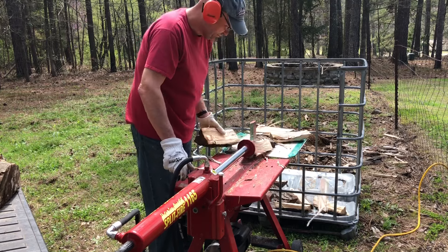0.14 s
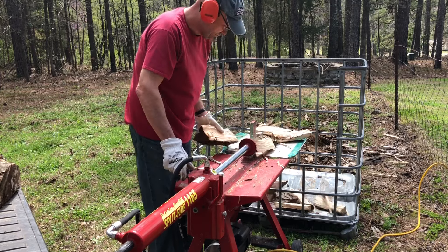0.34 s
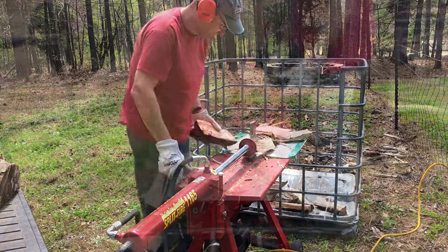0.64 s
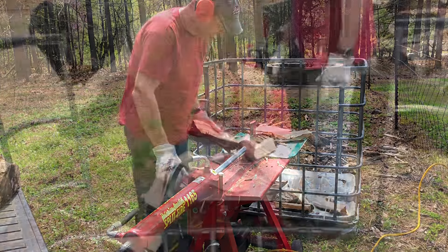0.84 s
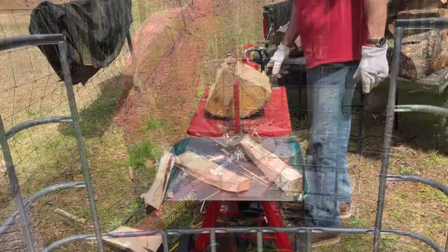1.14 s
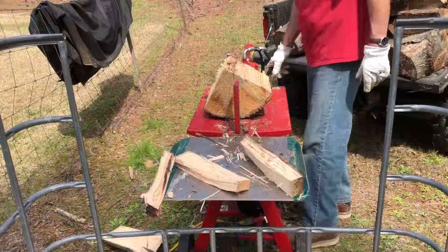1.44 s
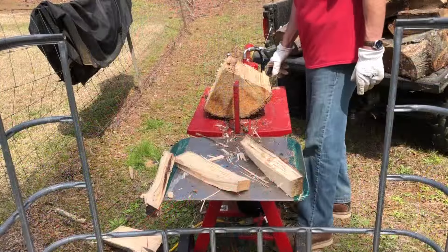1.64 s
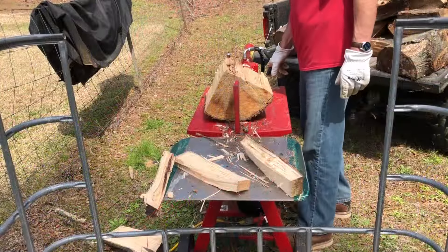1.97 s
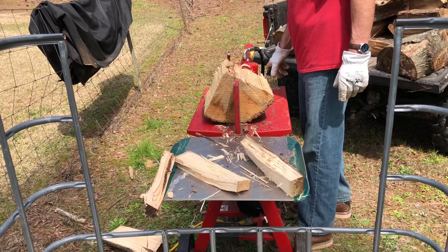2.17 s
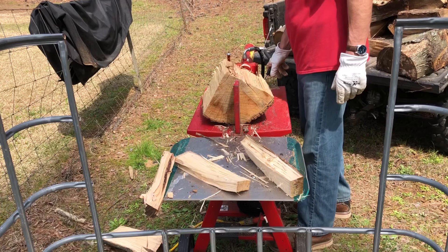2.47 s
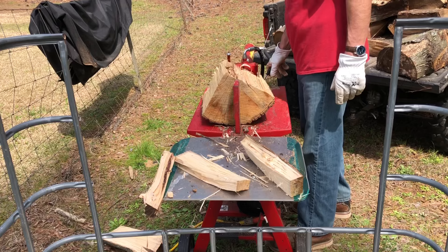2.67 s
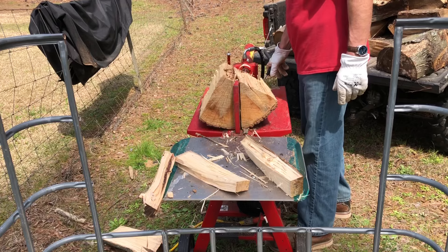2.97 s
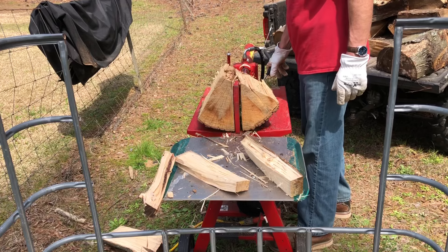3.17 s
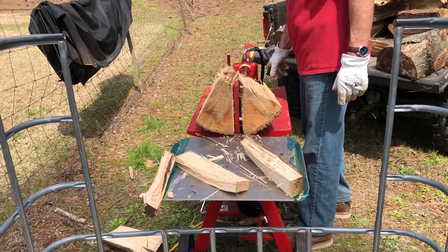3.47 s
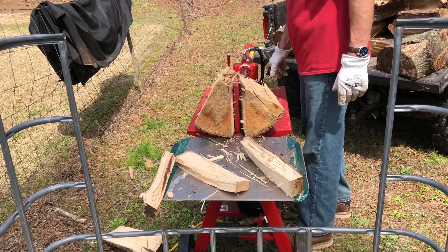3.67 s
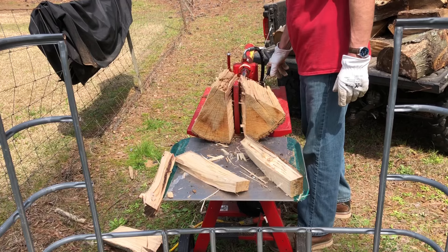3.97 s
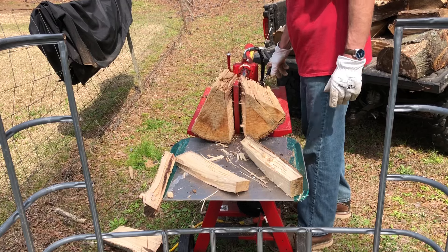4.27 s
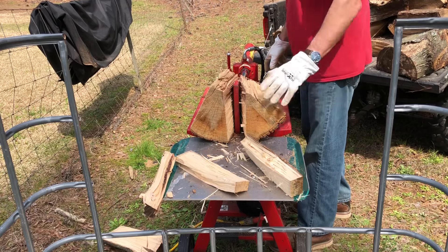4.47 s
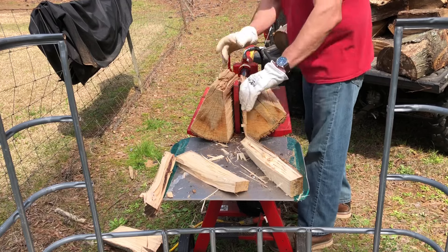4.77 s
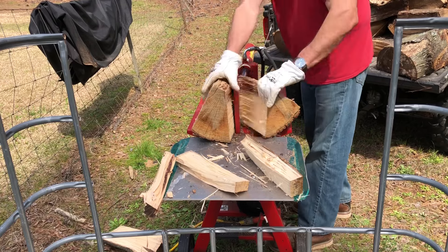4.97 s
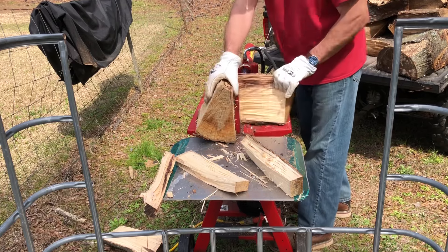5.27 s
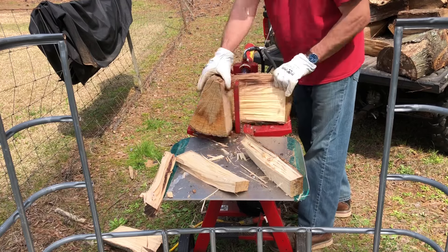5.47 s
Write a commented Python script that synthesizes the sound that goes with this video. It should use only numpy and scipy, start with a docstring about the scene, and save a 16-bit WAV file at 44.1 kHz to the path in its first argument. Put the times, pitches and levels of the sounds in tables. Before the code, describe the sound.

Outdoors, an electric log splitter's gear pump whines throughout. A thrown split piece clatters onto dry wood as a high squeal stops and the whine warbles. It firms up under load, then the log snaps with a steel jolt, lurches open with a hard knock and tearing fibres, and crackles. After softer knocks, the halves are pulled apart with faint cracks and a brief rising swish. Close microphone, slight open-air scatter.

```python
"""An electric log splitter outdoors: its gear pump whines from shaft-locked tones, warbling when slack.
First the pump squeals while a split piece clatters onto a woodpile in bursts of decaying noise and modes.
Then the ram forces a log onto the wedge: it snaps, jolting the steel frame into ringing, and lurches open.
Fibres crackle as ticks and dense splinter noise while the halves knock on the ringing steel bed.
Last they are pulled apart: fainter cracks, and a swish of band noise that climbs in pitch."""
import sys
import numpy as np
from scipy import signal
from scipy.fft import rfft, irfft
from scipy.io import wavfile
from scipy.ndimage import uniform_filter1d

SR = 44100
rng = np.random.default_rng(int(sys.argv[2]) if len(sys.argv) > 2 else 0)


def to_wav(s):
    """Save 16-bit WAV."""
    ch = np.atleast_2d(s).T  # columns
    pcm = np.round(np.clip(ch, -1, 1) * 32767)  # PCM
    wavfile.write(sys.argv[1], SR, pcm.astype(np.int16))


N = 247842
TIME = np.arange(N) / SR
TEETH = 11

# motor shaft speed before swing and jitter: t/s, speed/(turns per s)
SHAFT = [(0, 59.6), (2.18, 59.58), (2.31, 57.3), (2.4, 59.2), (3.5, 59.5), (4.1, 59), (4.9, 59.4),
         (5.62, 59.33)]
# slack spells, the pump speed swinging:
# start/s, load returns/s, first crest/s, swings/(1/s), depth/Hz, calm at/s
SLACKS = [(.345, .62, .407, 12.25, 2.9, 1.08), (2.28, 2.62, 2.355, 12.1, 1.7, 2.9),
          (3.98, 4.33, 4.075, 11.85, 1.5, 4.85)]
# relative spectrum of a wood blow's body: f/Hz, level/dB
BODY = [(40, -50), (150, -14), (400, -6.5), (600, 5), (950, -1), (1400, 1), (2200, -4), (3500, -10),
        (6000, -18), (15000, -54)]


def amp(db):
    """Decibels to gain."""
    return 10 ** (np.asarray(db) / 20)


def unit(x):
    """Scales to rms 1."""
    return x / np.sqrt(np.mean(x ** 2) + 1e-20)


def curves(rows):
    """Each column of a timed table, sample by sample."""
    s, *columns = np.transpose(rows)
    return [np.interp(TIME, s, c) for c in columns]


def read(points, hz):
    """A spectrum in dB, interpolated on a log-frequency axis."""
    f, db = np.transpose(points)
    return np.interp(np.log(hz + 1), np.log(f), db)


def colour(x, points):
    """Filters x by a spectrum, then scales to rms 1."""
    gain = amp(read(points, np.fft.rfftfreq(len(x), 1 / SR)))
    return unit(irfft(rfft(x) * gain, len(x)))


def drift(hz):
    """Slow noise of rms 1, rolling off around hz."""
    f = np.fft.rfftfreq(N, 1 / SR)[:N // 64]
    spectrum = rfft(rng.standard_normal(N // 32))[:len(f)]
    slow = irfft(spectrum / (1 + (f / hz) ** 4))
    return unit(np.interp(TIME, np.linspace(0, TIME[-1], len(slow)), slow))


def decay(t, t60):
    """Falls 60 dB in t60 seconds."""
    return np.exp(-np.log(1000) * t / t60)


def gate(start, end, rise_s, fall_s):
    """Rises to 1 from start, holds, and falls to 0 from end."""
    rise = np.clip((TIME - start) / rise_s, 0, 1)
    return rise * np.clip(1 - (TIME - end) / fall_s, 0, 1)


def add(mix, s, sound):
    """Mixes a sound in at s seconds."""
    part = mix[max(round(s * SR), 0):][:len(sound)]
    part += sound[:len(part)]


def fluttering(cycles, share):
    """A tone, of which a share wanders in strength and phase."""
    wander = (drift(38.5) + 1j * drift(43)) / np.sqrt(2)
    flutter = np.sqrt(1 - share ** 2) + share * wander
    return (flutter * np.exp(2j * np.pi * (cycles + rng.random()))).real


def yard(x, echo_db=-17, t60=0.71):
    """Weak, decaying scatter from the ground and things nearby."""
    t = np.arange(2 ** 15) / SR
    noise = colour(rng.standard_normal(len(t)), [(100, -2.0), (2500, -7.5), (15000, 0.5)])
    tail = noise * decay(t, t60) * (t > .006)
    return x + amp(echo_db) * signal.oaconvolve(x, tail / np.linalg.norm(tail))[:N]


def load(unload_s=0.109, reload_s=0.28, push_rise_s=0.29, push_fall_s=0.24):
    """Oil pressure drops in each slack spell; the ram pushes once. Both 0-1."""
    # the ram drives the log at the wedge: start/s, end/s
    push_span = (0.86, 2.13)
    slack = sum(gate(start, end, unload_s, reload_s) for start, end, *_ in SLACKS)
    return 1 - np.clip(slack, 0, 1), gate(*push_span, push_rise_s, push_fall_s)


def states(pressure, pushing):
    """Shares of pushing, coasting and running slack."""
    return np.array([pressure * pushing, pressure * (1 - pushing), 1 - pressure])


def unrest(rise_s=0.0305, fade_s=.35):
    """For each slack spell, how strongly the speed swings, 0-1."""
    return [gate(start, calm - fade_s, rise_s, fade_s) for start, *_, calm in SLACKS]


def swing():
    """The springy drive lets the slack pump run fast and slow, in Hz of shaft speed, until it calms."""
    total_hz = np.zeros(N)
    for size, (_, _, crest, per_s, depth_hz, _) in zip(unrest(), SLACKS):
        total_hz += depth_hz * size * np.cos(2 * np.pi * per_s * (TIME - crest))
    return total_hz


def squealing(end_s=0.325, fall_s=0.056):
    """1 while the pump squeals at the end of the first stroke, then falls to 0."""
    return np.clip(1 - (TIME - end_s) / fall_s, 0, 1)


def one_turn(orders, db, phases, turns, size=8192):
    """A pattern of shaft orders that repeats at every turn."""
    lines = np.zeros(size // 2 + 1, complex)
    lines[orders] = amp(db) * np.exp(1j * phases) * size / 2
    return np.interp(turns % 1 * size, np.arange(size), irfft(lines))


def casing(x):
    """The thin casing's treble resonances lift the lines that pass them, so these flare and fade."""
    # casing resonances: f/Hz, width/Hz, lift/dB
    resonances = [(4100, 240, 5), (4730, 89, 0.5), (5250, 180, 9), (5790, 110, 8), (7270, 330, 6.5),
                  (7880, 270, 6), (8600, 210, 8), (9360, 200, 8.5), (10410, 310, 9), (11400, 250, 0.5),
                  (13600, 240, 8), (14750, 260, 10)]
    f = np.fft.rfftfreq(N, 1 / SR)
    lift_db = sum(db / (1 + (2 * (f - hz) / width) ** 2) for hz, width, db in resonances)
    return irfft(rfft(x) * amp(lift_db), N)


def oil_rush(turns, pressure, loaded_db=-49, slack_drop_db=4, spurt=0.22):
    """Oil rushes through the valve in spurts, once a turn, as coloured noise with the fan's."""
    # relative spectrum of oil and fan noise: f/Hz, level/dB
    rush_spectrum = [(30, -32), (60, -22), (120, -18.5), (330, -32), (480, -31), (650, -8.5), (950, -17.5),
                     (1400, -11), (2250, -28.5), (2700, -14), (3600, -22), (6000, -31), (16000, -71)]
    spurts = 1 + spurt * np.cos(2 * np.pi * turns)
    rush = colour(rng.standard_normal(N) * spurts, rush_spectrum)
    return rush * amp(loaded_db - slack_drop_db * (1 - pressure))


def buzz(turns, pressure, pushing, loaded_db=-2.5, slack_drop_db=5, pushing_db=1, firm=0.26, loose=0.75):
    """Unequal teeth give a line at each shaft order, with hiss between; strong lines break up when slack."""
    # weak orders, before scatter, casing and load gain: f/Hz, level/dB
    weak_spectrum = [(60, -81), (330, -68), (700, -68), (1500, -63), (2300, -63.5), (2900, -59),
                     (3600, -86), (4200, -65.5), (4850, -85), (5400, -74.5), (6300, -72), (8000, -70),
                     (10500, -73.5), (12500, -73.5), (15500, -79.5)]
    # strong lines: multiple of shaft speed
    strong_orders = [10, 12, 13, 19, 21, 23, 30, 43, 45, 46, 47, 50, 55, 66, 71, 77, 87, 88, 89, 99, 121,
                     143, 154, 177, 232]
    # their peak levels, order by order: pushing/dB, coasting/dB, slack/dB
    strong_levels = [(-46, -59, -63), (-72, -52.5, -59), (-53, -54.5, -58.5), (-57, -68, -71),
                     (-69, -76, -82), (-65, -55, -69), (-59, -61, -74), (-49, -52, -49.5), (-73, -80, -46),
                     (-71, -58, -75), (-60, -58, -88), (-68, -55.5, -61), (-57.5, -56.5, -52),
                     (-72, -60.5, -64), (-65, -61, -75), (-59, -66, -57), (-64, -63, -71), (-53, -85, -62),
                     (-63.5, -61.5, -63), (-58, -69.5, -63), (-57, -63.5, -68), (-62, -81, -73),
                     (-60, -76, -83), (-68, -74, -67), (-74, -62, -78)]
    orders, scatter_db, hiss_db = np.arange(1, 266), 3, -5  # hiss relative to the weak lines
    level_db = read(weak_spectrum, orders * SHAFT[0][1])
    level_db = level_db + scatter_db * rng.standard_normal(len(orders))
    weak = one_turn(orders, level_db, rng.uniform(0, 2 * np.pi, len(orders)), turns)
    weak += amp(hiss_db) * np.std(weak) * colour(rng.standard_normal(N), weak_spectrum)
    weak_gain = amp(loaded_db - slack_drop_db * (1 - pressure) + pushing_db * pushing)
    shares = states(pressure, pushing)
    unsteady = loose + (firm - loose) * pressure
    strong = np.zeros(N)
    for order, db in zip(strong_orders, strong_levels):
        strong += amp(db) @ shares * fluttering(order * turns, unsteady)
    return strong + casing(weak) * weak_gain


def sing(turns, base_db=-61.5, slack_db=-56, first_db=6, squeal_db=-41.5, flutter=.9, lope=0.49):
    """Fourth tooth harmonic: a clean squeal, then a tone beating once a turn, strongest in slack spell one."""
    cycles = 4 * TEETH * turns
    spells = unrest()
    squeal = amp(squeal_db) * squealing() * np.cos(2 * np.pi * cycles)
    level = amp(base_db) + amp(slack_db + first_db * spells[0]) * sum(spells)
    loping = 1 + lope * np.cos(2 * np.pi * turns)
    return np.sqrt(2) * (squeal + level * loping * fluttering(cycles, flutter))


def teeth(turns, even_turns, wobble, pressure, pushing, shimmer_db=1.52, loose=0.8, low_swing=0.5):
    """Meshing teeth: the lowest tone flutters while the ram runs free; the next two when slack."""
    # lowest gear tone: t/s, rms level/dB
    first_levels = [(0.0, -40), (0.03, -36.5), (0.51, -45.5), (0.89, -39), (1.05, -50), (1.94, -30.5),
                    (2.16, -37.5), (2.21, -30.5), (2.28, -28.5), (2.38, -47.5), (2.61, -49.5),
                    (2.72, -26.5), (3.02, -44.5), (3.43, -39), (3.47, -35.5), (3.91, -36), (4.02, -45.5),
                    (4.29, -43.5), (4.7, -34), (5.1, -47), (5.21, -37.5), (5.62, -40.5)]
    # its octave, the second harmonic: t/s, rms level/dB
    second_levels = [(0.5, -55), (0.61, -50.5), (1.48, -43), (1.58, -51.5), (2.24, -39.5), (2.45, -52.5),
                     (2.72, -42), (2.98, -53.5), (3.02, -39.5), (3.07, -57), (3.2, -42), (3.82, -48.5),
                     (3.95, -40), (4.12, -55), (4.66, -42.5), (5.09, -50), (5.49, -43.5), (5.62, -59)]
    # third harmonic, rms, before the squeal's cut: pushing/dB, coasting/dB, slack/dB
    third_levels = (-48.5, -45.5, -57.5)
    # swing moves each harmonic along the casing's resonances: gain/(dB per Hz of swing)
    throbs = [0.16, 0.9, -1]
    rest_s, stop_s, third_squeal_db = 5.12, .1, -11
    flutter_moving, flutter_steady = 0.55, 0.033  # unsteady share, ram running free and held
    held = np.maximum(pushing, np.clip((TIME - rest_s) / stop_s, 0, 1))
    unsteady = flutter_moving + (flutter_steady - flutter_moving) * held
    rattling = loose * (1 - pressure)
    # the low harmonics warble less deeply than the fourth
    mesh = TEETH * (even_turns + low_swing * (turns - even_turns))
    third_db = np.dot(third_levels, states(pressure, pushing)) + third_squeal_db * squealing()
    levels = curves(first_levels) + curves(second_levels) + [third_db]
    out = np.zeros(N)
    for k, (db, throb) in enumerate(zip(levels, throbs), 1):
        tone = fluttering(k * mesh, unsteady if k == 1 else rattling)
        out += amp(db + throb * wobble + shimmer_db * drift(27)) * tone
    return np.sqrt(2) * out


def pump(jitter_hz=0.032, slack_jitter_hz=.25, half_db=-62):
    """The motor turns the gear pump; pushing adds a faint tone an octave below the teeth."""
    pressure, pushing = load()
    wobble = swing()
    jitter = (jitter_hz + slack_jitter_hz * (1 - pressure)) * drift(34.8)
    turns = np.cumsum(curves(SHAFT)[0] + wobble + jitter) / SR
    even_turns = turns - np.cumsum(wobble) / SR
    undertone = amp(half_db) * pushing * np.cos(np.pi * TEETH * turns)
    whine = teeth(turns, even_turns, wobble, pressure, pushing) + sing(turns)
    return whine + buzz(turns, pressure, pushing) + undertone + oil_rush(turns, pressure)


def ping():
    """A thin wire of the wood cage rings as the wood settles: one decaying sine."""
    # wire: t/s, f/Hz, level/dB, t60/s
    s, hz, db, t60 = (.239, 9480, -46, .3)
    out, t = np.zeros(N), np.arange(SR // 2) / SR
    add(out, s, amp(db) * decay(t, t60) * np.sin(2 * np.pi * hz * t))
    return out


def knocks(blows, t60, body_db, thud_db, clack_db, thud_length=1.05, clack_length=0.49, grain_db=-3.0):
    """Each blow excites rough wood's dense modes as dying noise; the thud rises slowest, lasts longest."""
    # relative spectra of the low and high parts: f/Hz, level/dB
    thud_spectrum = [(30, -72), (70, -19), (130, -7), (200, 3.5), (255, -5.5), (330, 11), (430, -8.5),
                     (700, -1), (2000, -42)]
    clack_spectrum = [(60, -40), (800, 3), (2500, 2.5), (4000, 1), (7000, -1), (10000, -3), (15500, -10)]
    out, t = np.zeros(N), np.arange(2 ** 15) / SR
    for s, db, low_db, high_db in blows:
        a, b, c, d = rng.standard_normal((4, len(t)))
        chatter = amp(grain_db * unit(uniform_filter1d(d, size=90)))
        thud = colour(a, thud_spectrum) * decay(t, t60 * thud_length) * (1 - np.exp(-t / 0.017))
        body = colour(b, BODY) * decay(t, t60) * (1 - np.exp(-t / 0.0027))
        clack = colour(c, clack_spectrum) * decay(t, t60 * clack_length) * chatter
        blow = amp(thud_db + low_db) * thud + amp(body_db) * body + amp(clack_db + high_db) * clack
        add(out, s, amp(db) * blow)
    return out


def ring(blows, modes, gain_db, rough):
    """Blows set decaying modes ringing; rubbing wood roughens each mode."""
    out, t = np.zeros(N), np.arange(SR // 3) / SR
    for s, db, *_ in blows:
        for hz, level_db, t60 in modes:
            rub = 1 + rough * unit(uniform_filter1d(rng.standard_normal(len(t)), size=200))
            tone = decay(t, t60) * np.sin(2 * np.pi * hz * t)
            add(out, s, amp(gain_db + db + level_db) * rub * tone)
    return out


def woodpile(body_t60=0.35):
    """The thrown piece clatters and briefly rings the dry billets that it lands on."""
    # bounces, relative levels: t/s, level/dB, thud/dB, clack/dB
    bounces = [(.022, -14.5, -16.5, -12), (.032, -9, -14, -18.5), (.057, -16.5, -16, -8),
               (.072, -12, -22, -16), (.111, -19, -11, -12.5), (.15, -19.5, -13, -31), (.19, -23, -9, -29),
               (.253, -16.5, -16, -23.5), (.352, -23, -5.5, -17), (.377, -21, -14, -32)]
    # billet modes: f/Hz, relative level/dB, t60/s
    billet_modes = [(238.2, -7.5, 0.51), (445, -3, 0.39), (579, 3.5, 0.17), (693, -23, 0.088),
                    (798, -17, 0.091), (946, 6, 0.082), (1005, -2, 0.17), (1040, -3, 0.087)]
    wood = knocks(bounces, body_t60, body_db=-12.5, thud_db=-3.5, clack_db=-2.5)
    return wood + ring(bounces, billet_modes, gain_db=-18.5, rough=0.89)


def steel(body_t60=0.18):
    """Quick slips of the splitting log ring the frame; wood knocks on the bed and sets it ringing."""
    # wood knocks, relative levels: t/s, level/dB, thud/dB, clack/dB
    bed_knocks = [(.615, -28, -15, -10), (.67, -22.5, -9, -10.5), (1.78, -25, -8.5, -21),
                  (2.192, -19, -21, -23), (2.283, -23.5, -12, -10.5), (2.673, -23, -1, -4.5),
                  (2.692, -8.5, -17.5, -22), (2.728, -38, -4, -3), (2.776, -32, -15, 2),
                  (3.022, -21.5, -14, -10.5), (3.456, -26, -14, -16), (3.689, -24.5, -23, -22),
                  (4.011, -26, 0, -17), (4.084, -33.5, -8, -6), (4.387, -18, -11, -12.5),
                  (4.428, -15.5, -20, -15), (4.44, -19.5, -14, -11.5), (4.478, -21, -17, -19)]
    # slips as the log gives way: t/s, relative level/dB
    log_slips = [(2.1932, -26.5), (2.195, -25), (2.1967, -23.5), (2.2005, -26), (2.2043, -45)]
    # frame and bed modes: f/Hz, relative level/dB, t60/s
    frame_modes = [(1000, -3, 0.15), (1090, -8.5, 0.16), (1580, -20, .1), (1800, 1.5, 0.085),
                   (1870, 3, 0.16), (2100, 3, 0.1), (2397, 5, 0.13), (2880, -6, 0.1), (3183, -1, 0.092),
                   (3400, -9, 0.067), (3650, -2, 0.078), (3766, 2, 0.093), (4030, 2.5, 0.065),
                   (4300, -8, 0.09), (4310, 4, 0.079), (4800, -19, .05)]
    bed_modes = [(168.7, -14.5, 0.67), (277, -50, 0.073), (333, -7, 0.53), (431, -19, 0.12),
                 (757, -0.5, 0.093), (824, -8, 0.031), (870, 6, 0.18), (938, -19, 0.17), (1089, -5, 0.28),
                 (1370, -19.5, 0.1), (1780, -33, 0.069), (1642, -4.5, 0.058)]
    wood = knocks(bed_knocks, body_t60, body_db=-11.0, thud_db=-1, clack_db=0.5)
    frame = ring(log_slips, frame_modes, gain_db=-9.5, rough=0.78)
    return wood + frame + ring(bed_knocks, bed_modes, gain_db=-17.5, rough=0.55)


def swish(half_width_hz=2100, grain_db=4):
    """One half slides along the wedge, its grain ridges passing faster and faster: rising band noise."""
    # swish: t/s, level/dB, centre f/Hz
    swish_path = [(5.05, -78, 2950), (5.1, -44, 3790), (5.13, -50, 5580), (5.15, -41.5, 6560),
                  (5.175, -43, 8150), (5.21, -46, 9900), (5.26, -80, 10600)]
    db, hz = curves(swish_path)
    lowpass = signal.butter(2, half_width_hz, fs=SR, output="sos")
    band = signal.sosfilt(lowpass, rng.standard_normal(N) + 1j * rng.standard_normal(N))
    shifted = (band * np.exp(2j * np.pi * np.cumsum(hz) / SR)).real
    return amp(db) * unit(shifted * amp(grain_db * drift(300)))


def crackle(per_s=2200, spread_db=5, rise_s=0.026, fall_s=.06):
    """Many tiny splinters of very unequal size, as the log opens, is pushed through and is pulled apart."""
    # splintering spells: start/s, end/s, level/dB
    splinter_spells = [(2.654, 2.85, -37.5), (2.854, 4.024, -46.5), (4.85, 5.13, -49.5), (5.14, 5.193, -43)]
    # relative spectrum: f/Hz, level/dB
    splinter_spectrum = [(500, -11), (2000, -2), (4000, -5), (7000, -3), (10000, -2.5), (15500, -13)]
    size = amp(spread_db * np.minimum(rng.exponential(1, N), 4))
    size *= rng.random(N) < per_s / SR
    t = np.arange(2 ** 8) / SR
    bursts = signal.oaconvolve(size, decay(t, 0.0048))[:N] * rng.standard_normal(N)
    spells = sum(amp(db) * gate(start, end, rise_s, fall_s) for start, end, db in splinter_spells)
    return spells * colour(bursts, splinter_spectrum)


def tear(count=5, start_s=2.755, step_s=.0232, first_db=-12.5, step_db=-1, centre_hz=3900):
    """As the log lurches open, fibres give way in an even run, each weaker: rows of (s, dB, Hz)."""
    return [(start_s + k * step_s, first_db + k * step_db, centre_hz) for k in range(count)]


def cracks(crack_db=-5, octaves=1.63, crack_t60=0.011, log_db=-22, log_t60=0.083, after_db=-24, after_t60=0.086):
    """A fibre breaks with a bright tick and faint after-rustle; the log answers with duller noise."""
    # loudest fibres to break: t/s, relative level/dB, centre f/Hz
    loud_fibres = [(2.7016, -14, 8500), (2.8712, -8.5, 11400), (2.9983, -17.5, 4200), (3.021, -11.5, 7900),
                   (3.1754, -19, 10100), (3.302, -8, 5700), (3.347, -21, 8350), (3.3738, -21.5, 11780),
                   (3.406, -20.5, 4400), (3.455, -12, 11300), (3.4601, -13, 5140), (3.687, -13, 7200),
                   (3.7567, -9, 5450), (3.8436, -13.5, 9910), (3.8483, -16, 12300), (3.8657, -8.5, 10900),
                   (3.8938, -18, 6030), (3.903, -11.5, 10700), (3.9134, -14, 5050), (3.9922, -19.5, 7220),
                   (4.865, -23, 6830), (5.0202, -24, 6470), (5.5484, -21.5, 8250)]
    out, t = np.zeros(N), np.arange(2 ** 12) / SR
    f = np.geomspace(100, 20000, num=24)
    for s, db, hz in loud_fibres + tear():
        a, b = rng.standard_normal((2, len(t)))
        hump_db = -6 * (np.log2(f / hz) / octaves) ** 2
        bright = colour(a, np.transpose([f, hump_db]))
        tick = bright * (decay(t, crack_t60) + amp(after_db) * decay(t, after_t60))
        log = colour(b, BODY) * decay(t, log_t60) * (1 - np.exp(-t / 0.0032))
        add(out, s, amp(db) * (amp(crack_db) * tick + amp(log_db) * log))
    return out


def scene():
    """The dry pump, and the wood and steel with the yard's scatter."""
    wood = woodpile() + steel() + cracks() + crackle() + swish() + ping()
    return (pump() + yard(wood))[None]


def record(dry, low_cut_hz=60, edge_hz=15950, ceiling=.45):
    """The recorder cuts the deep bass, rounds off the highest peaks, then limits the band."""
    thin = signal.sosfilt(signal.butter(3, low_cut_hz, "high", fs=SR, output="sos"), dry)
    soft = ceiling * np.tanh(thin / ceiling)
    lowpass = signal.firwin(401, edge_hz, window=("kaiser", 9), fs=SR)
    return signal.oaconvolve(soft, lowpass[None], "same")


dry = scene()
out = record(dry)
to_wav(out)
```